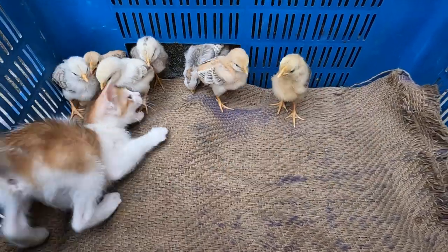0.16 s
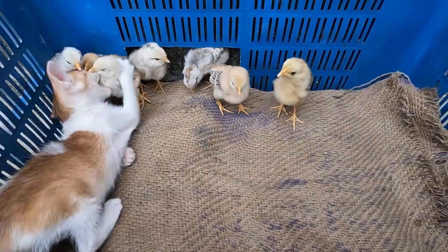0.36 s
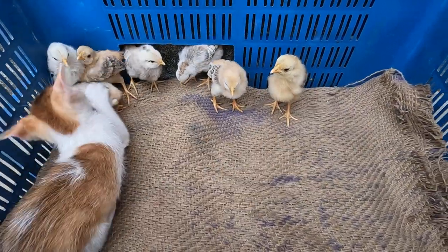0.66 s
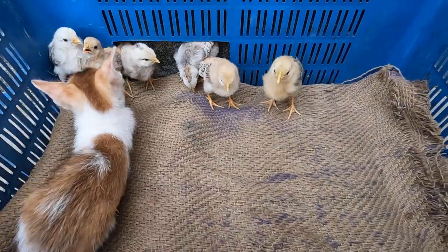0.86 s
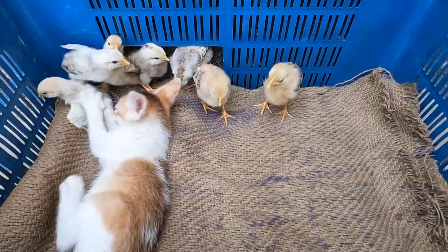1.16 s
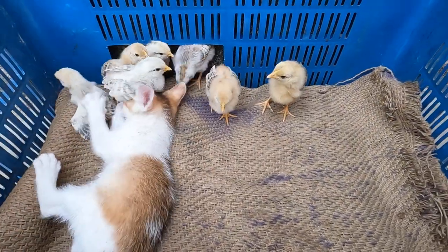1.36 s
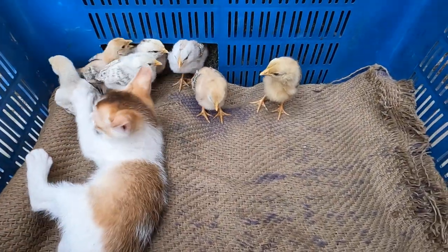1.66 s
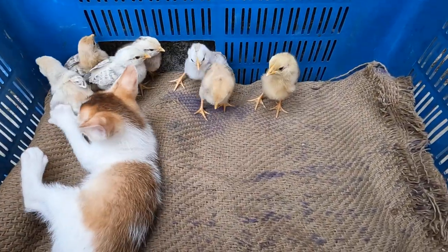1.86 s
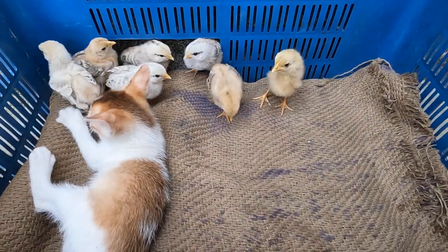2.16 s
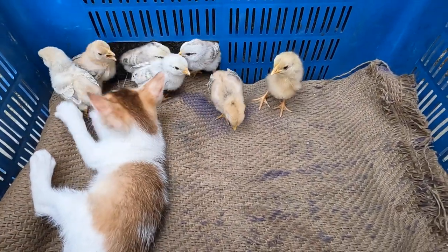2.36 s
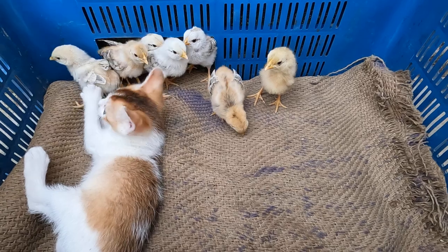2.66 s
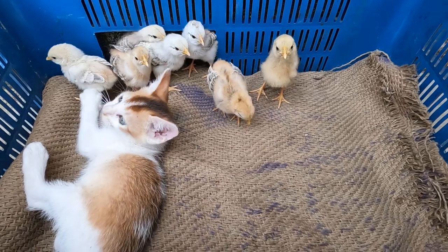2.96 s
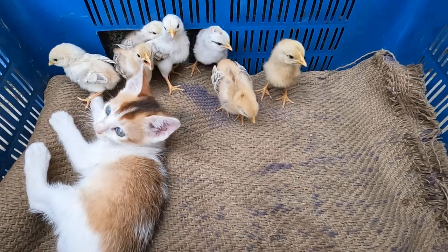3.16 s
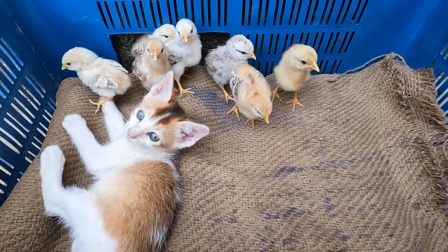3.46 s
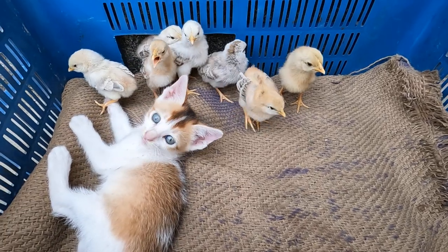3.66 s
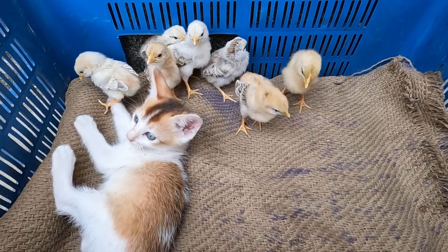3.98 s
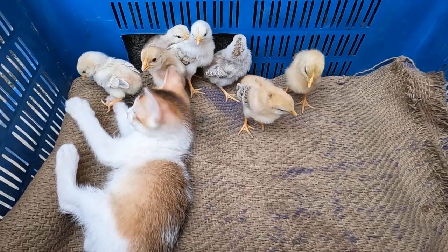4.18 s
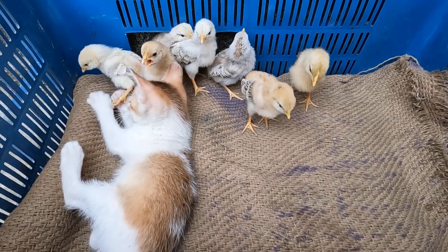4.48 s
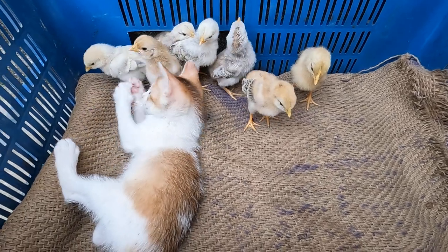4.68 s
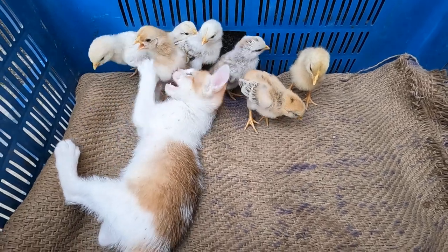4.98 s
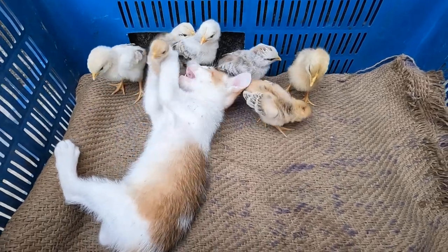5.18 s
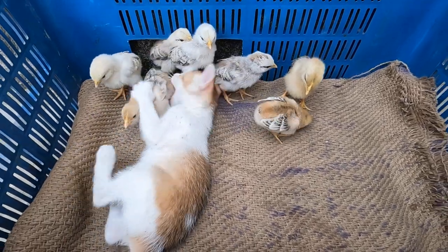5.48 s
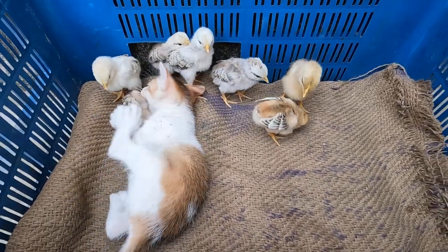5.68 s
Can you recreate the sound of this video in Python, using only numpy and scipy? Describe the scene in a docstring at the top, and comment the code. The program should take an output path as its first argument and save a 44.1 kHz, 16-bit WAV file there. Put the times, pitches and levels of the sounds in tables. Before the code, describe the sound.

Baby chicks peep and twitter over each other in a plastic crate, a piercing two-part peep recurring steadily above soft rustling and light taps.

```python
"""Chicks peep in a plastic crate indoors while a kitten paws at them on the sacking.
A rumble, strongest at the very start, a hum, rustling and a distant throbbing chirr lie under soft gliding chirps.
Soon one chick repeats a loud falling whistle that breaks into a lower arch, amid dull knocks and swooping trills;
then the huddle twitters as the kitten pounces, and hoarse cheeps join. A last few trills and chirps follow the peeps.
Voices are tones with shaped overtones and air noise; crate and room answer with decaying reflections."""
import sys
import numpy as np
from scipy import signal
from scipy.fft import rfft, irfft
from scipy.io import wavfile
from scipy.ndimage import uniform_filter1d, map_coordinates

SR = 44100
rng = np.random.default_rng(int(sys.argv[2]) if len(sys.argv) > 2 else 0)


def generate_wav(sig):
    """Save sig (samples, or channels by samples) to the path in sys.argv[1] as 16-bit PCM at SR."""
    pcm = np.round(np.clip(np.atleast_2d(sig).T, -1, 1) * 32767).astype(np.int16)
    wavfile.write(sys.argv[1], SR, pcm)


N = 257094
TIME = np.arange(N) / SR

# spectrum of taps on the plastic, also of the rustling sacking: frequency_hz, relative_level_db
TAP_SPECTRUM = [(100, -3), (350, 0), (650, -5), (1300, -4), (2600, -19), (12000, -42)]
# spectrum of air driven through the beak: frequency_hz, relative_level_db
AIR_SPECTRUM = [(2000, -19), (5000, 6), (11500, -14), (14500, -29.5)]

# voices of the chicks: random pitch deviation (share), and air noise against the tone (dB)
PEEP_JITTER, CHIRP_JITTER, CHIRP_AIR_DB = .003, .007, -36
FLUTTER_PER_S = 800   # rate of the random flutter in overtones and hoarse air


def from_db(db):
    """Level to amplitude: 20 dB is a factor of ten."""
    return 10 ** (np.asarray(db) / 20)


def rms_one(x):
    """Normalise to unit root-mean-square amplitude."""
    return x / np.sqrt(np.mean(x ** 2) + 1e-20)


def at_hz(points, hz):
    """Interpolate a spectrum in dB linearly along a logarithmic frequency axis."""
    points_hz, points_db = np.transpose(points)
    return np.interp(np.log(np.maximum(hz, 1)), np.log(points_hz), points_db)


def noise(spectrum, size, side_db):
    """Filtered stereo noise of rms 1: a common part plus an opposed part sets the interaural coherence."""
    white = rng.standard_normal((2, size))
    gain = from_db(at_hz(spectrum, np.fft.rfftfreq(size, 1 / SR)))
    mid, side = irfft(rfft(white) * gain, size)
    return rms_one(mid + from_db(side_db) * side * [[1], [-1]])


def waver(t, rate):
    """Band-limited random modulation: a smooth curve through `rate` random values per second, spread about 1."""
    return map_coordinates(rng.standard_normal(256), [(t - t[0]) * rate], order=3, mode="wrap")


def span(start, end):
    """Sample times from start to end, in seconds."""
    return np.arange(int(start * SR), int(end * SR)) / SR


def add(out, start, sound):
    """Superposition: mix a sound in at its time."""
    i = max(int(start * SR), 0)
    out[..., i:i + sound.shape[-1]] += sound[..., :max(N - i, 0)]


def arc(t, first, middle, last):
    """A parabolic glide through three equally spaced values."""
    parabola = np.polyfit([-1, 0, 1], [first, middle, last], 2)
    return np.polyval(parabola, np.linspace(-1, 1, len(t)))


def background(hum_hz=150, hum_db=-59, chirr_hz=1820, chirr_db=-58, throbs_per_s=8.4):
    """Filtered noise for rumble and sacking, a phase-modulated hum, and an amplitude-modulated far chirr."""
    # rumble spectrum: frequency_hz, relative_level_db
    rumble_spectrum = [(22, 6), (145, 1), (350, -17), (900, -33.5), (3500, -15), (7000, -35), (15000, -68)]
    # rumble level: time_s, level_db
    rumble_level = [(.04, -34.5), (.15, -46), (5.83, -49.5)]
    # sacking under the kitten: time_s, level_db (before its random wavering)
    rustle_level = [(0.6, -60.5), (2.5, -71.5), (5.83, -65)]

    rumble = noise(rumble_spectrum, N, side_db=-16) * from_db(np.interp(TIME, *np.transpose(rumble_level)))

    hum_phase = 2 * np.pi * hum_hz * TIME + 1.5 * waver(TIME, 13.0)
    hum = np.sqrt(2) * from_db(hum_db) * np.sin(hum_phase)

    rustle_db = np.interp(TIME, *np.transpose(rustle_level)) + 1.9 * waver(TIME, 34)
    rustle = noise(TAP_SPECTRUM, N, side_db=-2.0) * from_db(rustle_db)

    throb = np.abs(np.sin(np.pi * throbs_per_s * TIME + 0.054 * waver(TIME, 0.64))) ** 1.54
    chirr_band = [(chirr_hz / 2, -65), (chirr_hz, 0), (chirr_hz * 2, -65)]
    chirr = from_db(chirr_db) * throb * noise(chirr_band, N, side_db=-8.0)
    return rumble + hum + rustle + chirr


def syrinx(t, hz, db, overtone_db, second_db, air_db, jitter, shimmer_db, order_db=-4, fade_s=.002):
    """Source and filter: an unsteady tone and its harmonics pass throat and beak, with a hiss of air."""
    # gain of throat and beak for the overtones: frequency_hz, gain_db
    beak_gain = [(4500, -2), (6000, -15), (7000, -21), (8300, -25), (9500, -31), (11000, -33),
                 (12500, -40.5), (15500, -55.5)]
    flutter_db = 1.3   # per harmonic number: higher overtones flutter more

    hz = hz * (1 + jitter * waver(t, 266.6))
    phase = 2 * np.pi * np.cumsum(hz) / SR
    tone = np.sin(phase) + from_db(air_db) * noise(AIR_SPECTRUM, len(t), side_db=-34.5)[0]
    for k in range(2, 6):
        own_db = second_db if k == 2 else overtone_db + order_db * (k - 2)
        gain = from_db(at_hz(beak_gain, k * hz) + own_db + flutter_db * k * waver(t, FLUTTER_PER_S))
        audible = k * hz < SR / 2   # no aliasing
        tone += gain * audible * np.sin(k * phase)
    fade = np.clip(np.minimum(t - t[0], t[-1] - t) / fade_s, 0, 1)
    return np.sqrt(2) * tone * fade * from_db(db + shimmer_db * waver(t, 110.3))


def chirps(edge_db=-11):
    """Frequency glides: soft single notes bend along a parabola, swelling and fading."""
    # single chirps: start_s, end_s, first_hz, middle_hz, last_hz, level_db
    chirp_notes = [(0, 0.024, 3325, 3260, 2600, -30.5), (0.248, 0.416, 3840, 4920, 3670, -34.5),
                   (0.431, .522, 4180, 3950, 2500, -28.5), (0.613, 0.665, 3665, 3405, 2275, -28.5),
                   (0.766, 0.805, 5510, 5900, 5100, -25.5), (0.774, 0.844, 3950, 3660, 2870, -37),
                   (0.823, 0.903, 4400, 4350, 3970, -31), (0.876, 0.964, 3130, 3285, 2500, -31.5),
                   (0.935, 1.086, 4766, 4330, 2496, -20), (1.135, 1.185, 4060, 3620, 3300, -36.5),
                   (1.218, 1.323, 4200, 4900, 3950, -36.5), (1.333, 1.365, 3040, 2890, 2320, -31),
                   (1.567, 1.666, 4850, 4200, 2120, -32.5), (2.237, 2.287, 4250, 3700, 2850, -28.5),
                   (2.419, 2.492, 4400, 3660, 3120, -37), (3.056, 3.145, 3400, 3300, 3000, -35),
                   (3.064, 3.161, 4370, 4120, 3440, -35), (3.198, 3.279, 2763, 3930, 2570, -42),
                   (4.829, 4.947, 4000, 3590, 3130, -39), (5.312, 5.401, 5000, 4700, 3450, -48.5),
                   (5.42, 5.452, 2890, 4100, 5240, -30.5), (5.78, 5.84, 4000, 5130, 4760, -34)]
    out = np.zeros(N)
    for start, end, first_hz, middle_hz, last_hz, db in chirp_notes:
        t = span(start, end)
        hz = arc(t, first_hz, middle_hz, last_hz)
        level_db = db + edge_db * arc(t, 0.75, 0, 0.78) ** 2
        voice = syrinx(t, hz, level_db, overtone_db=-7, second_db=-3, air_db=CHIRP_AIR_DB,
                       jitter=CHIRP_JITTER, shimmer_db=2.5)
        add(out, start, voice)
    return out


def loud_peeps(last_hz=2020, top_share=0.37, rise_share=0.0523, fall_power=2.3,
               break_s=0.004, rasp=0.029, rasp_s=0.006):
    """Register break: a whistle starts with a rasp, sinks, then snaps into a lower register and arches away."""
    # loud peeps: start_s, break_s, end_s, first_whistle_hz, whistle_level_db, whistle_change_to_break_db,
    # arch_top_hz, arch_level_db, overtones_db, arch_second_harmonic_db (the last two before the beak's gain)
    peep_notes = [(0.225, 0.346, .386, 5140, -26, 7.5, 3043, -16.5, -5.5, -11.5),
                  (1.298, 1.412, 1.464, 4700, -27, -3.5, 2804, -27, -8, -4),
                  (1.702, 1.792, 1.853, 4580, -20, -3, 2996, -26, -1.5, 13.5),
                  (2.084, 2.2, 2.24, 4762, -17.5, -1, 3024, -21.5, 1.5, 1),
                  (2.468, 2.541, 2.63, 4700, -16, -6.5, 3186, -17, 3, 7),
                  (2.871, 2.975, 3.044, 4780, -18, 0, 3120, -20, -1.5, 1.5),
                  (3.288, 3.386, 3.461, 4496, -14.5, 1, 3115, -20, 0, 2),
                  (3.724, 3.803, 3.906, 4620, -19.5, 0.5, 3149, -17.5, 3, 2.5),
                  (4.167, 4.249, 4.342, 4620, -14.5, -14.5, 3143, -17.5, 1.5, -3),
                  (4.621, 4.695, 4.803, 4700, -14.5, -10.5, 3170, -20, 4, -2.5),
                  (5.068, 5.161, 5.233, 4870, -18.5, -2.5, 3105, -22, 1.5, 1.5)]
    # envelope of the arch: share_of_arch, level_db
    arch_envelope = [(0, -0.5), (.45, 3), (.8, -8), (1, -23)]
    onset_hz, break_hz, sink_power = 5680, 3899, 1.0   # the whistle glides in and sinks to the break
    lead_s, lead_db, attack_s, attack_db = .013, -27, .005, -15   # a soft lead-in, then the attack

    out = np.zeros(N)
    for (start, snap, end, first_hz, whistle_db, change_db,
         top_hz, arch_db, overtone_db, arch_second_db) in peep_notes:
        t = span(start - lead_s, end)

        # upper register
        along = np.clip((t - start) / (snap - start), 0, 1)
        sink = np.sin(np.pi / 2 * along ** sink_power) ** 2
        high = np.interp(t, [t[0], start + 0.0035], [onset_hz, first_hz]) - (first_hz - break_hz) * sink
        attack = np.interp(t - start, [-lead_s, -attack_s / 2, attack_s / 2], [lead_db, attack_db, 0])
        high_db = whistle_db + change_db * along + attack

        # lower register
        u = np.clip((t - snap) / (end - snap), 0, 1)
        rise = np.maximum(1 - u / top_share, 0)
        fall = np.maximum(u - top_share, 0) / (1 - top_share)
        low = top_hz * (1 - rise_share * rise ** 2) - (top_hz - last_hz) * fall ** fall_power
        low_db = arch_db + np.interp(u, *np.transpose(arch_envelope))

        # the membranes flutter as they start and as they change register
        broken = np.clip((t - snap) / break_s + .5, 0, 1)
        onset_flutter = np.exp(-((t - start + 0.0076) / (2 * rasp_s)) ** 2)
        unsteady = onset_flutter + np.exp(-((t - snap) / break_s) ** 2)
        hz = (high + broken * (low - high)) * (1 + rasp * unsteady * waver(t, 1600))
        level_db = high_db + broken * (low_db - high_db)
        second_db = overtone_db + broken * (arch_second_db - overtone_db)
        air_db = -52 + 9 * broken + 27 * unsteady ** .5
        voice = syrinx(t, hz, level_db, overtone_db, second_db, air_db, jitter=PEEP_JITTER, shimmer_db=2.5)
        add(out, t[0], voice)
    return out


def knocks(t60=0.11, body_db=-3):
    """Damped impact: paws and feet tap the plastic, and each noise burst decays exponentially."""
    # knocks on the crate: time_s, level_db (before body_db)
    taps = [(0.356, -36), (0.473, -39), (0.735, -39), (1.783, -41.5), (1.944, -45.5), (4.984, -43)]
    out, t = np.zeros((2, N)), span(0, 2 * t60)
    for s, db in taps:
        decay = from_db(db + body_db - 60 * t / t60)
        add(out, s - .002, noise(TAP_SPECTRUM, len(t), side_db=-26.0) * decay)
    return out


def trills(roundness=1.5, swoops_per_s=40, edge_s=.003, swell_db_per_s=181, fade_db_per_s=137):
    """Frequency modulation: pitch swoops up from an arc about forty times a second, level and octave with it."""
    # trills: start_s, end_s, first_trough_hz, middle_trough_hz, last_trough_hz, swoop_height_hz, level_db,
    # loudest_share_of_length, crest_against_trough_db, trough_second_harmonic_db (before the beak's gain)
    trill_notes = [(0.518, 0.626, 4700, 3540, 3300, 1194, -20.5, 0.34, -10, -5),
                   (0.776, 0.828, 5400, 3400, 3300, 1620, -25.5, 0.53, 5, 18.5),
                   (0.825, 0.903, 3900, 4590, 4470, 1675, -19, 0.44, -14.5, -11),
                   (0.968, 1.051, 4100, 3120, 2940, 1500, -27.5, 0.46, -11, 15),
                   (1.068, 1.145, 4700, 3365, 3060, 1800, -21, .5, -4.5, 9.5),
                   (1.276, 1.353, 4300, 3085, 3310, 1350, -21, 0.5, 1, 5),
                   (1.345, 1.423, 3513, 3890, 3300, 1005, -19, 0.56, -1, -5),
                   (1.454, 1.516, 3960, 3410, 3150, 1750, -34, 0.82, -7, -7),
                   (1.537, 1.638, 4590, 4110, 2750, 1306, -26, 0.85, -7, 7),
                   (1.869, 1.992, 3550, 3220, 3130, 1108, -16, 0.35, -16.5, -9),
                   (4.995, 5.118, 3830, 3280, 2970, 1336, -26, 0.64, 0, 4),
                   (5.444, 5.516, 4900, 4830, 4250, 411, -19.5, 0.92, -2.5, 12),
                   (5.518, 5.569, 4200, 2810, 3730, 1318, -20, 0.27, -1.5, 9.5),
                   (5.563, 5.615, 3940, 3535, 3200, 405, -14.5, 0.12, -8.5, -22)]
    uneven = .14   # spread of the height along the swoops (share)

    out = np.zeros(N)
    for (start, end, first_hz, middle_hz, last_hz, height_hz,
         db, loudest, crest_db, octave_db) in trill_notes + huddle():
        t = span(start - edge_s, end + edge_s)
        turns = (t - start) / (end - start) * np.round((end - start) * swoops_per_s)
        swoop = np.abs(np.sin(np.pi * turns)) ** roundness
        height = height_hz * swoop * (1 + uneven * waver(t, swoops_per_s))
        hz = arc(t, first_hz, middle_hz, last_hz) + height

        past = t - start - loudest * (end - start)
        swell_db = np.minimum(swell_db_per_s * past, -fade_db_per_s * past)
        level_db = db + swell_db + crest_db * swoop
        voice = syrinx(t, hz, level_db, overtone_db=-2, second_db=octave_db * (1 - swoop), air_db=CHIRP_AIR_DB,
                       jitter=CHIRP_JITTER, shimmer_db=4.0, fade_s=2 * edge_s)
        add(out, t[0], voice)
    return out


def huddle(count=3, db=-31.5, pitch_hz=(3300, 4700), call_s=0.27):
    """Random superposition: as the kitten pounces, others trill softly downwards at chance times and pitches."""
    # pounces of the kitten, within which the calls begin: from_s, to_s
    pounces = [(.8, .98), (1.22, 1.32)]
    calls = []
    for pounce in pounces:
        for _ in range(count):
            s, hz = rng.uniform(*pounce), rng.uniform(*pitch_hz)
            calls.append((s, s + call_s, 1.1 * hz, hz, .8 * hz, .2 * hz, db, .5, 0, 0))   # a row as in trills
    return calls


def hoarse_cheeps(cheep_s=.085, db=-37):
    """Turbulence without phonation: air rasps through the open beak without a tone, swelling and fading."""
    # starts of the hoarse cheeps: start_s
    hoarse_starts = [.92, 1.224, 2.415, 2.83, 3.236]
    out = np.zeros(N)
    for start in hoarse_starts:
        t = span(start, start + cheep_s)
        swell = arc(t, 0, 0.59, 0)
        rasping = from_db(db + 2 * waver(t, FLUTTER_PER_S))
        add(out, start, noise(AIR_SPECTRUM, len(t), side_db=-0.5)[0] * rasping * swell)
    return out


def reflections(spectrum, t, per_s):
    """Random impulse response: bounces at chance moments, others for each ear, filtered by the surfaces."""
    clicks = rng.standard_normal((2, len(t))) * (rng.random((2, len(t))) < per_s / SR)
    gain = from_db(at_hz(spectrum, np.fft.rfftfreq(len(t), 1 / SR)))
    return irfft(rfft(clicks) * gain, len(t)) / np.sqrt(per_s / SR)


def crate(x, t60=.03):
    """Interference: dense close reflections, unlike at each ear, make gliding tones swell and dip."""
    # sound glancing off the slats: frequency_hz, level_against_direct_db
    slat_spectrum = [(3200, -16), (4600, -3), (7000, -3), (12000, -8)]
    t = span(0, t60)
    decay = from_db(-60 * t / t60)
    slats = reflections(slat_spectrum, t, SR) * decay / np.sqrt(np.sum(decay ** 2))
    return x + signal.fftconvolve(x[None], slats, axes=1)[:, :N]


def delayed(x, delay_s):
    """Propagation delay: the same sound arrives later."""
    return np.interp(TIME - delay_s, TIME, x, left=0)


def room(x, t60=.33, bounces_per_s=260, room_db=-17, first_wall_s=.028, build_s=.05):
    """Reverberation: sparse bounces build up and decay, treble sooner, with a distinct echo."""
    # spectrum of the reflected sound: frequency_hz, relative_level_db
    wall_spectrum = [(1500, 6), (3100, -1), (3350, 10.5), (3700, -2), (4400, 10.5), (5300, -0.5),
                     (6500, -3.5), (9000, 2)]
    # far wall: delay_s, level_db
    far_wall = [(.066, -29)]
    t = span(0, 2 * t60)
    build = 1 - np.exp(-np.maximum(t - first_wall_s, 0) / build_s)
    bounces = reflections(wall_spectrum, t, bounces_per_s)
    tail = (bounces + bounces.mean(axis=0)) * from_db(-60 * t / t60) * build   # partly common to both ears
    dull = signal.sosfiltfilt(signal.butter(2, 7000, fs=SR, output="sos"), tail)
    tail = dull + (tail - dull) * from_db(-45 * t)   # the treble loses a further 45 dB per second
    tail *= from_db(room_db) / np.sqrt(np.sum(tail ** 2) / 2)
    echoes = sum(from_db(db) * delayed(x, delay) for delay, db in far_wall)
    return signal.fftconvolve(x[None], tail, axes=1)[:, :N] + echoes


def placed(x, left_db):
    """Interaural level difference: the louder ear draws the source to its side."""
    return x * from_db(left_db * np.array([[.5], [-.5]]))


def scene(corner_db=-5):
    """Superposition of direct and reflected voices, knocks and background."""
    # voices and knocks sit a little to the left, drifting slightly inwards: time_s, left_against_right_db
    seat = [(2.4, 3.0), (3.4, 2.5)]
    caller = loud_peeps()
    others = trills() + chirps() + hoarse_cheeps()
    reverberation = room(caller + from_db(corner_db) * others)   # crouched in the corner, others stir it less
    left_db = np.interp(TIME, *np.transpose(seat))
    return placed(crate(caller + others) + reverberation + knocks(), left_db) + background()


def record(dry, limit_db=-13.5, average_s=0.0039, cutoff_hz=15600):
    """Dynamic compression: short-term power saturates at a ceiling; a steep low-pass then cuts the top."""
    power = uniform_filter1d(np.mean(dry ** 2, axis=0), max(int(average_s * SR), 1))
    limited = dry / (1 + (power / from_db(limit_db) ** 2) ** 2) ** .25
    return signal.sosfilt(signal.ellip(10, .1, 80, cutoff_hz, fs=SR, output="sos"), limited)


dry = scene()
out = record(dry)
generate_wav(out)
```